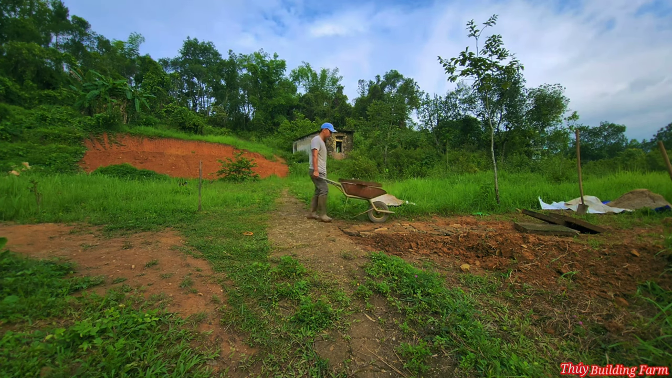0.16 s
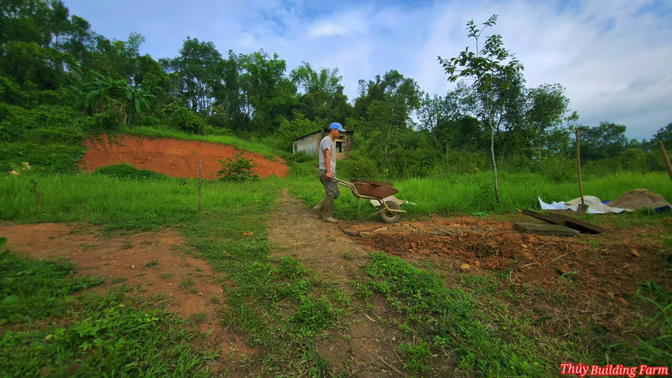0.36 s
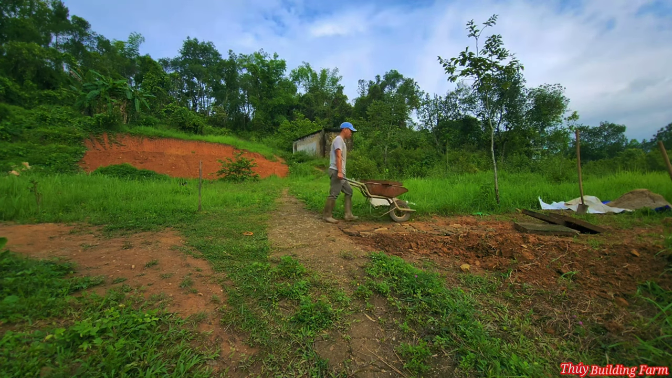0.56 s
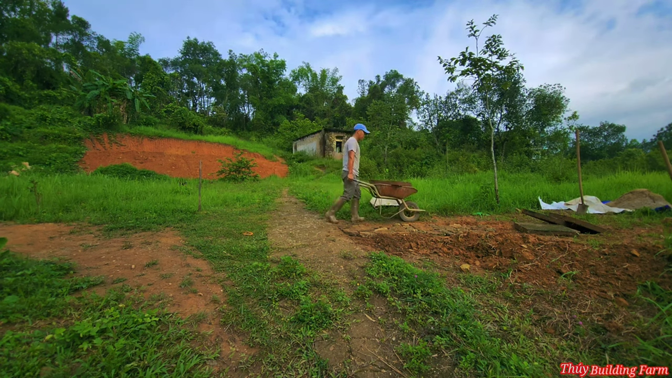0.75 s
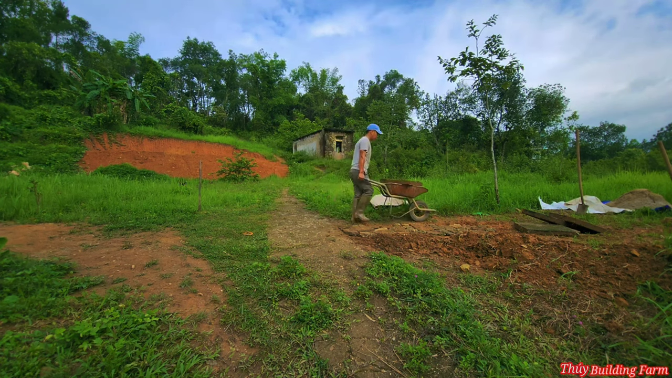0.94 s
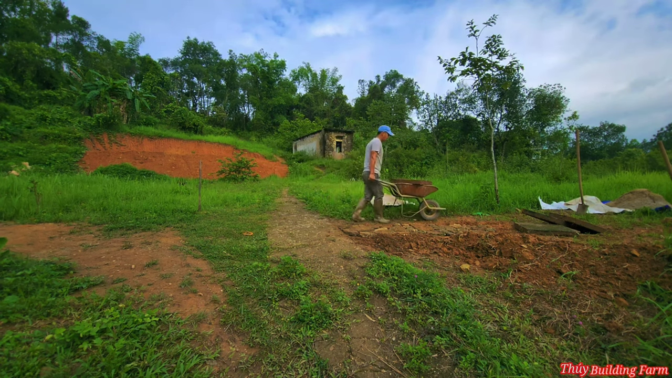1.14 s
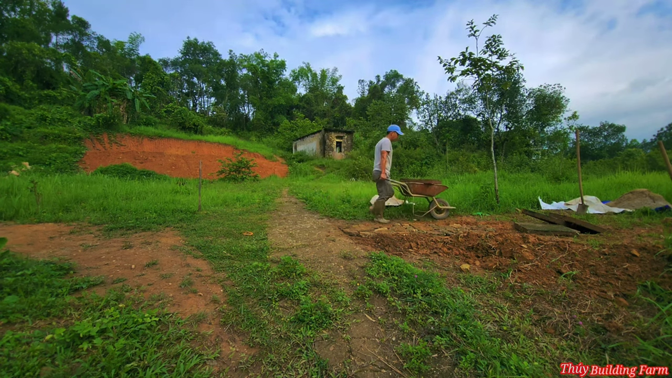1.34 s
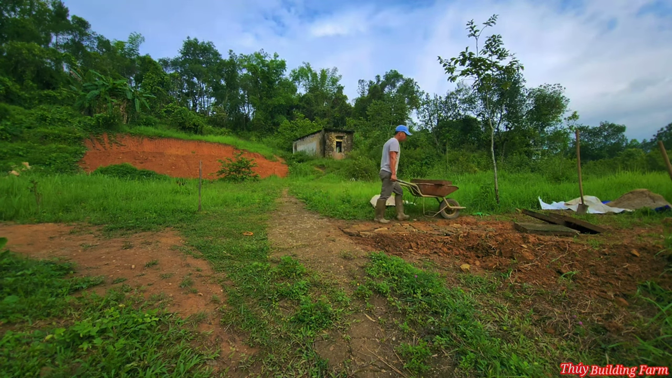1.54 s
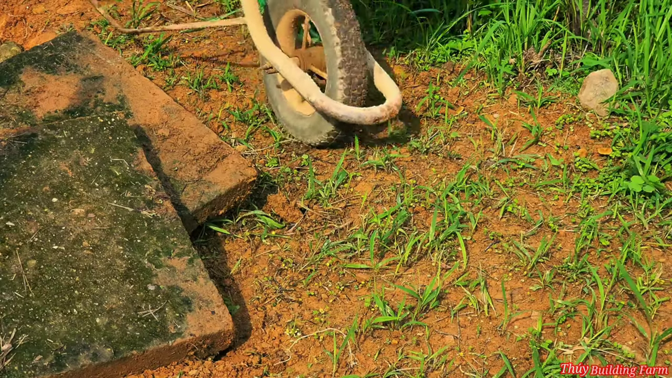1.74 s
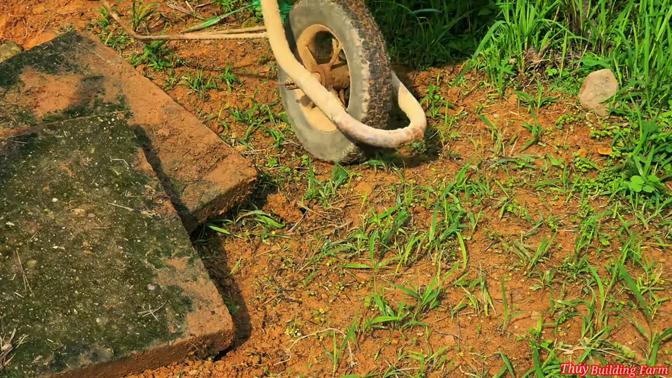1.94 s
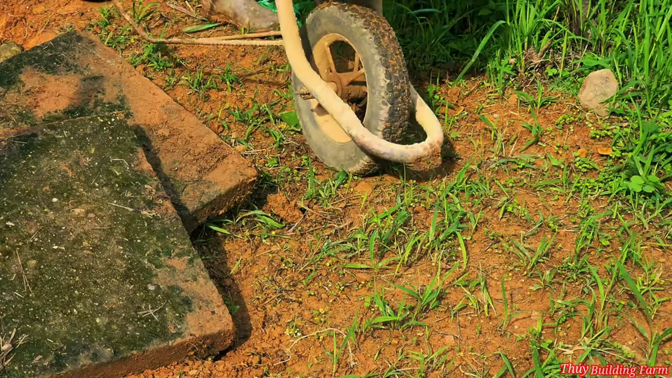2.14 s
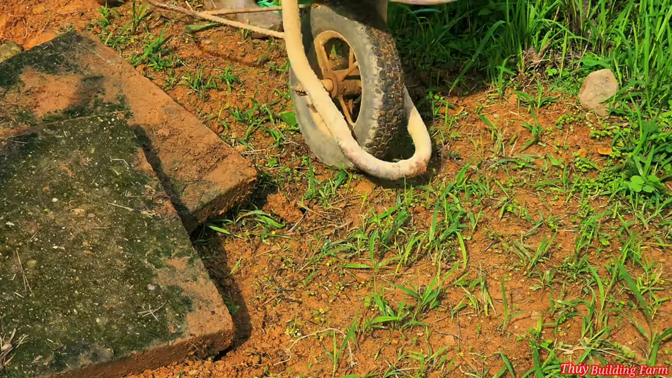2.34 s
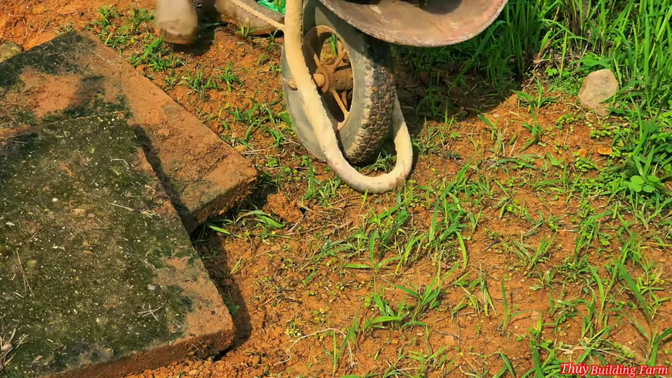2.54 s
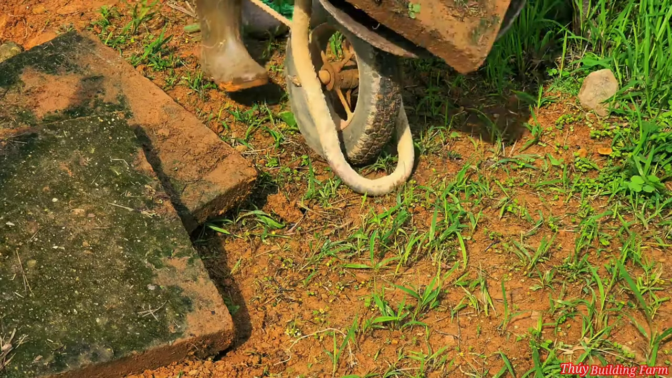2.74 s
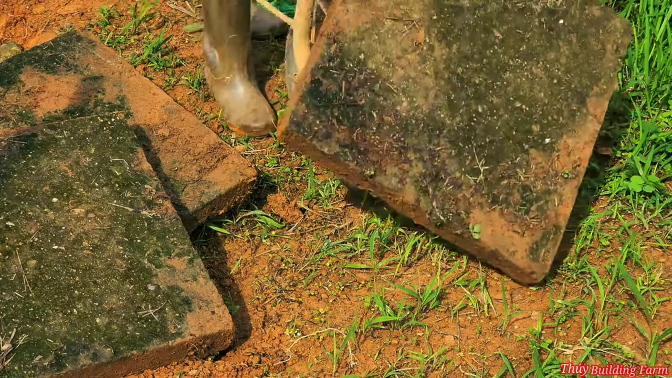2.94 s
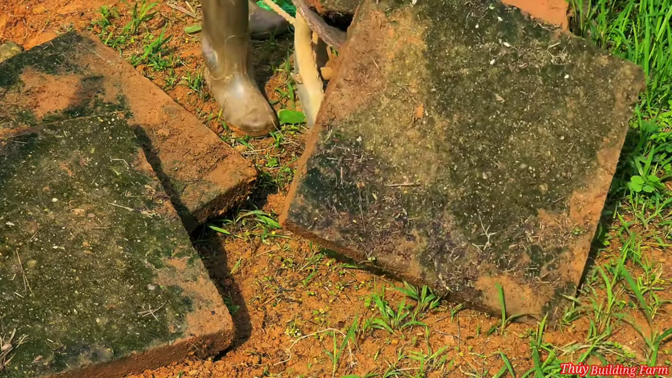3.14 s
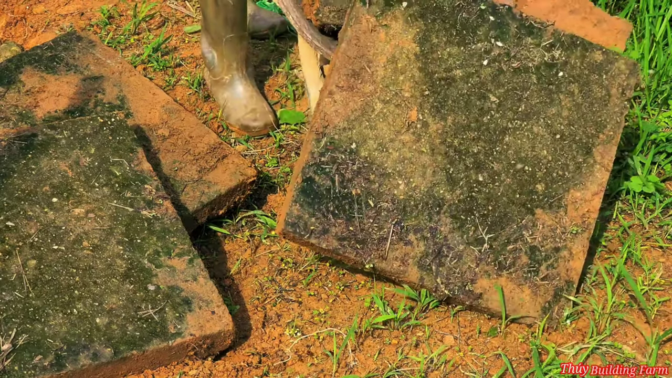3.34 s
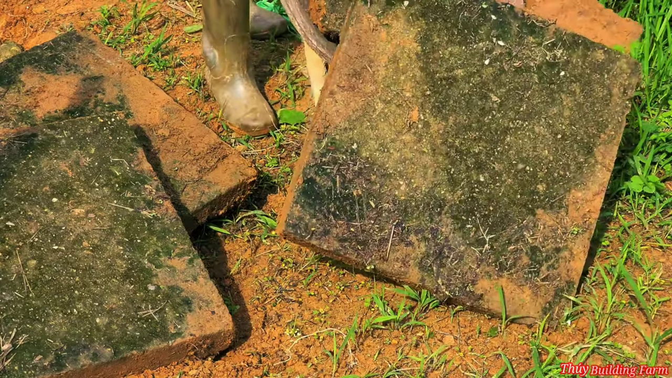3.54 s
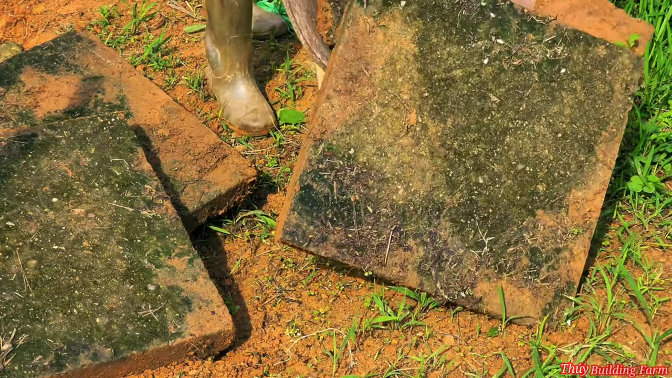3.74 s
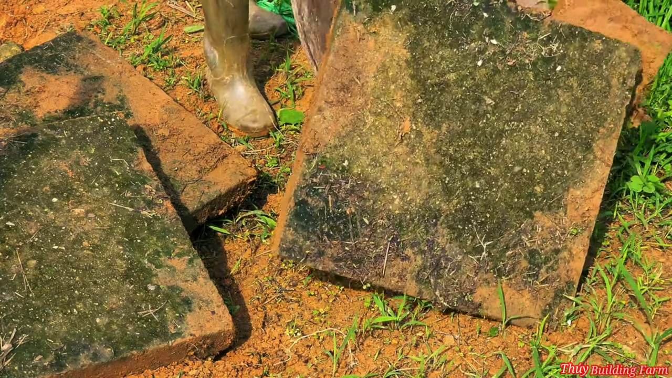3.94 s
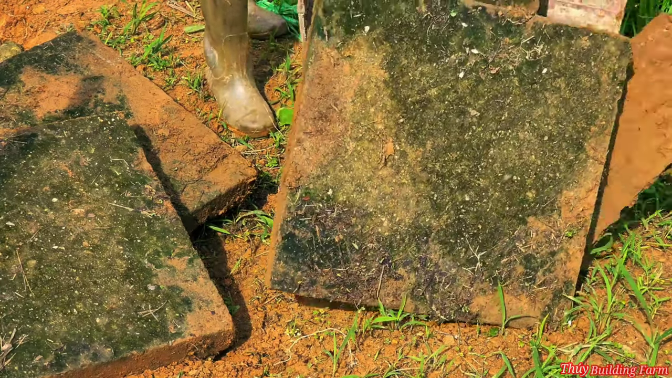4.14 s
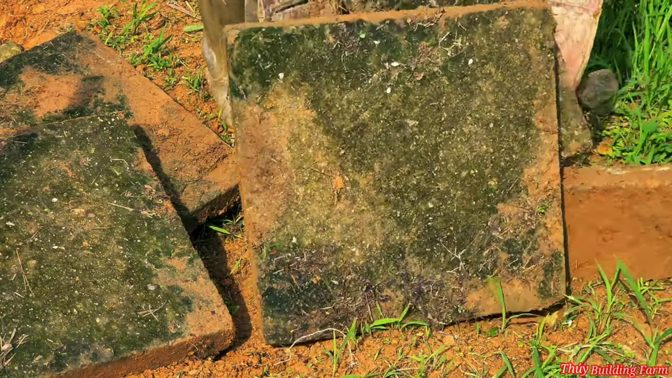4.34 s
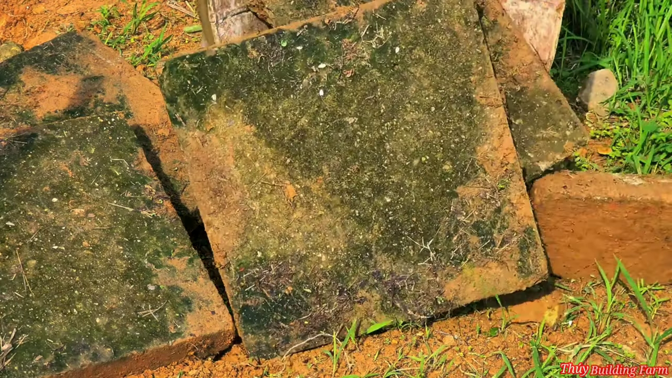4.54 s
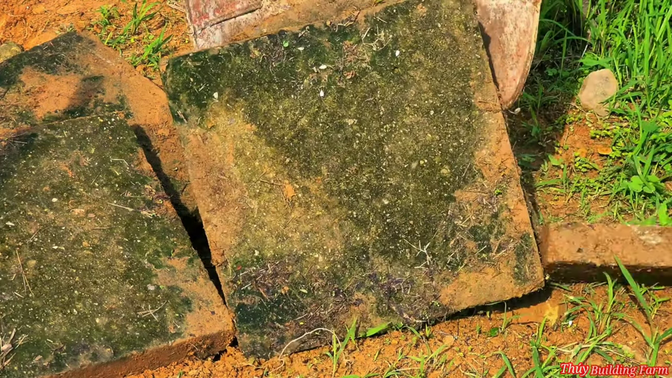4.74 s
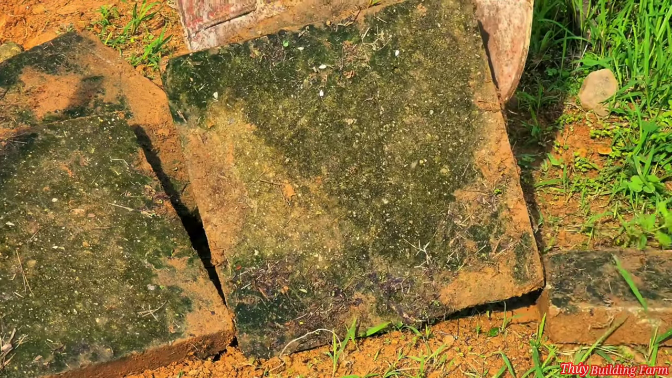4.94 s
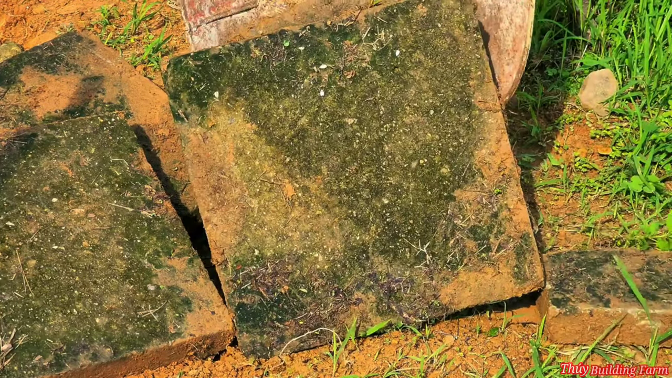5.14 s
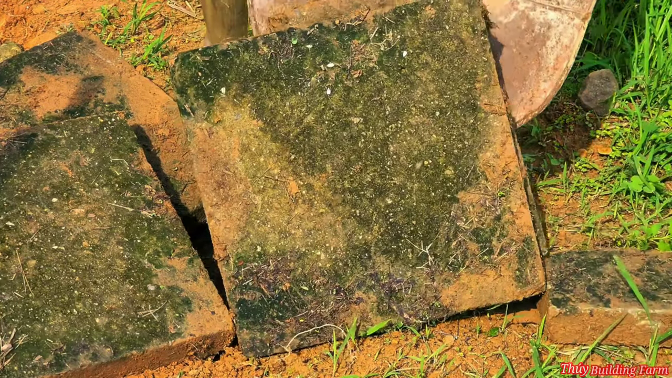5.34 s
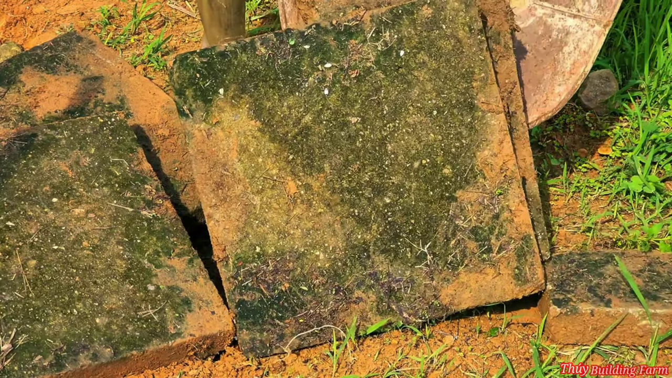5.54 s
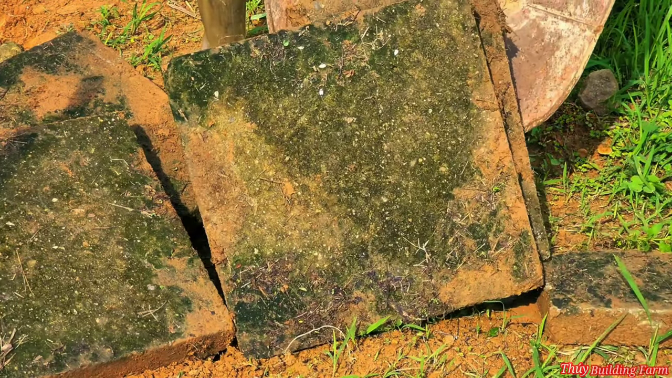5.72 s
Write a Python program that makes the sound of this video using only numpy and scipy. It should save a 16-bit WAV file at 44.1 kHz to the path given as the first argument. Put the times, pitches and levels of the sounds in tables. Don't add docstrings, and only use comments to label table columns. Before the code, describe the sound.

For the first 2.6 seconds it is quiet and outdoors: a high insect drone, thin leafy and airy hiss, low rumble, and a fast pulsing cricket until about 1.8. Small wheel crunches and a jolt open it, boots crunch near 0.4, a bird trills brightly to the right at 0.7 and 0.95, and crumbling dirt rolls at 1.3-1.6. Faint chirps come after 2.2. At 2.65 stone slabs slide over a steel tray, abruptly loud and very close: coarse grinding, hollow metal ringing, low squeals and a hard knock near 3.06. It drops at 3.5 to a quiet creaking creep, with falling bird whistles at 3.65, 3.7 and 3.98. From 4.1 a second grind swells, with jerking slips at 4.4 and 4.5 and heavy scraping to 4.95. Gritty low thuds at 5.0, then shorter knocks at 5.1-5.4 and a last one at 5.65 as the slabs settle. Peaks sound squashed.

```python
import sys
import numpy as np
from scipy import signal
from scipy.io import wavfile

SR = 44100
rng = np.random.default_rng(int(sys.argv[2]) if len(sys.argv) > 2 else 0)


def dump_mix(stems):
    frames = np.atleast_2d(stems).T
    limited = np.clip(frames, -1, 1)
    pcm = np.round(limited * 32767).astype(np.int16)
    wavfile.write(sys.argv[1], SR, pcm)


def how_loud(loudness_db):
    steps = np.asarray(loudness_db, float) / 20
    return 10 ** steps


N = 254898
TIP_S = 2.64
# pitch_hz, likeness
FAR_LIKENESS = [(60, 1), (180, 0.91), (550, 0.2), (1650, 0.47), (4970, 0.18), (15000, 0.33)]


def rms_one(x):
    return x / np.sqrt(np.mean(x ** 2) + 1e-20)


def in_time(rows):
    s, *columns = np.transpose(sorted(rows))
    t = np.arange(N) / SR
    return [np.interp(t, s, column) for column in columns]


def at_hz(points, hz):
    points_hz, values = np.array(points)[:, 0], np.array(points)[:, 1]
    return np.interp(np.log(hz), np.log(points_hz), values)


def drift(rate, size=N):
    r = np.exp(-40 * np.pi * rate / SR)
    noise = rng.standard_normal(size // 20 + 2002)
    slow = signal.lfilter([1], [1, -2 * r, r * r], noise)[2000:]
    return np.interp(np.arange(size) / 20, np.arange(len(slow)), rms_one(slow))


def resonate(x, hz, width_hz):
    r = np.exp(-np.pi * width_hz / SR)
    feed = np.array([1, 0, -1]) * (1 - r * r) / 2
    return signal.lfilter(feed, [1, -2 * r * np.cos(2 * np.pi * hz / SR), r * r], x)


def grains(per_s, spread_db, size=N):
    hardness_db = spread_db * np.minimum(rng.exponential(1, (4, size)), 5)
    ticks = how_loud(hardness_db) * rng.choice([-1, 1], (4, size))
    happens = rng.random((4, size)) < per_s / SR
    return rms_one(ticks * happens + 1e-18).reshape(2, 2, size)


def bands(source, spectrum, likeness, patchy_db, patchy_rate):
    edges = 28 * 2 ** np.arange(0, 9.6, .5)
    for k, (low, high) in enumerate(zip(edges, edges[1:])):
        band_pass = signal.butter(2, [low, high], "band", fs=SR, output="sos")
        mid, side = signal.sosfilt(band_pass, source[k % 2])
        hz = np.sqrt(low * high)
        alike = np.clip(at_hz(likeness, hz), -1, 1)
        gain = how_loud(at_hz(spectrum, hz) + patchy_db * drift(patchy_rate, len(mid)))
        yield hz, gain * (np.sqrt(1 + alike) * mid + np.sqrt(1 - alike) * side * [[1], [-1]])


def swells(rows):
    t = np.arange(N) / SR
    return sum(how_loud(db) * np.sin(np.pi * np.clip((t - s) / length, 0, 1)) for s, length, db in rows)


def surge(s, rise_s, fall_s, db):
    age = np.arange(N) / SR - s
    span_db = 20
    away = np.maximum(-age / max(rise_s, .002), age / max(fall_s, .01))
    return how_loud(2 * (db - span_db * away))


def insects():
    # time_s, level_db
    drone = [(0.0, -54), (0.43, -53), (0.72, -56), (0.89, -52.5), (1.11, -54.5), (1.74, -54.5),
             (2.11, -52.5), (2.48, -53.5), (2.6, -52)]
    # pitch_hz, width_hz, level_db
    singing = [(4900, 820, -8.5), (5220, 1600, 4), (5500, 430, 9), (5780, 78, 10), (7430, 1800, -3.5)]
    t = np.arange(N) / SR
    clicks = grains(per_s=7700, spread_db=0.0)[0]
    chorus = 0
    for hz, width_hz, db in singing:
        voice = resonate(resonate(clicks, hz, width_hz), hz, width_hz)
        chorus = chorus + how_loud(db + 1.5 * drift(8)) * voice
    chorus = signal.sosfilt(signal.butter(4, 4250, "high", fs=SR, output="sos"), chorus)
    chorus = chorus - resonate(chorus, 6720, 1160)
    after_db = -54
    chorus_db = np.where(t < drone[-1][0], in_time(drone)[0], after_db)

    cricket_hz, pulses_per_s, first_s, last_s = 8520, 40.0, -.004, 1.84
    beat = np.sin(np.pi * pulses_per_s * (t - first_s))
    cricket = (t < last_s) * np.abs(beat) ** 3 * np.sin(2 * np.pi * cricket_hz * t)
    cricket_db = -62 - 1.7 + 1.1 * drift(5.9)
    return how_loud(chorus_db) * rms_one(chorus) + how_loud(cricket_db) * cricket * how_loud([[1.5], [-1.5]])


def rumble_gain():
    # time_s, level_db
    jolts = [
        (.03, -56),
        (.41, -54.5),
        (.83, -60),
    ]
    early_db, later_db, stronger_s = -67.5, -61.5, 1.76
    steady_db = np.where(np.arange(N) / SR < stronger_s, early_db, later_db)
    jolt_power = sum(surge(s, rise_s=0.027, fall_s=0.14, db=db) for s, db in jolts)
    return np.sqrt(how_loud(2 * steady_db) + jolt_power)


def field():
    # pitch_hz, level_db (per Hz)
    field_colour = [(18, -39), (30, -9), (149, -1), (238, -11), (907, -22), (1310, -19), (3540, -40),
                    (4150, -15), (5680, 2), (6650, -30), (7990, -12), (9350, -25), (12500, -20),
                    (14600, -17), (15800, -17)]
    noise = rng.standard_normal((2, 2, N))
    parts = list(bands(noise, field_colour, FAR_LIKENESS, patchy_db=2.2, patchy_rate=3.2))
    rumble = sum(band for hz, band in parts if hz < 317)
    leaves = sum(band for hz, band in parts if 317 < hz < 3580)
    air = sum(band for hz, band in parts if 3580 < hz < 10000)
    top = sum(band for hz, band in parts if hz > 10000)
    hiss = how_loud(-69) * rms_one(leaves) + how_loud(-68.5) * rms_one(air) + how_loud(-68.5) * rms_one(top)
    return rumble_gain() * rms_one(rumble) + hiss


def walking():
    # start_s, length_s, level_db
    steps = [
        (.388, 0.047, -48.5),
        (.425, 0.031, -49),
        (1.8, 0.026, -68),
        (1.835, 0.0086, -55),
    ]
    # pitch_hz, level_db (per Hz)
    step_colour = [(35, -41), (60, -37), (163, 10), (810, -3), (1120, 3.5), (2710, 0), (5580, -6),
                   (9510, -15), (15500, -15)]
    # start_s, length_s, level_db
    clods = [
        (.032, 0.0088, -53),
        (.047, 0.011, -50),
        (.8, 0.027, -80),
        (.93, 0.036, -65),
        (1.3, 0.097, -54),
        (1.38, 0.17, -58),
        (1.48, 0.097, -58),
        (2.52, .08, -64),
    ]
    # pitch_hz, level_db (per Hz)
    wheel_colour = [(120, -37), (200, -6), (300, -4), (468, -18), (591, 2), (1060, -35), (1490, -2.5),
                    (3000, -17), (4940, -55), (8360, -120)]
    # start_s, length_s, pitch_hz, level_db
    frame_hums = [
        (0.56, 0.12, 362, -69),
        (1.285, 0.041, 340, -60),
        (1.334, 0.11, 1160, -70),
        (1.525, 0.079, 368, -59),
    ]
    size = int(TIP_S * SR)
    dirt = grains(per_s=3700, spread_db=4.5, size=size)
    crunch = sum(band for hz, band in bands(dirt, step_colour, FAR_LIKENESS, 0.83, 30))
    roll = sum(band for hz, band in bands(dirt[..., ::-1], wheel_colour, FAR_LIKENESS, 0.8, 48))
    near = swells(steps)[:size] * rms_one(crunch) + swells(clods)[:size] * rms_one(roll)
    for s, length, hz, db in frame_hums:
        hum = resonate(dirt[0, 0], hz, 17)
        near = near + swells([(s, length, db)])[:size] * rms_one(hum)
    return np.pad(near, ((0, 0), (0, N - size)))


def chirps():
    # start_s, notes (count), level_db
    trills = [
        (.715, 4, -35),
        (.939, 3, -34),
        (1.3, 1, -54),
        (1.38, 1, -52),
        (2.26, 2, -53),
        (2.41, 3, -55),
        (2.59, 2, -52),
    ]
    # start_s, length_s, start_hz, end_hz, level_db
    whistles = [
        (3.637, 0.028, 6470, 2900, -39.5),
        (3.698, 0.037, 5500, 3700, -37),
        (3.975, 0.046, 5500, 3700, -40),
    ]
    gap_s, note_s, grows_s, grows_db = .0355, 0.018, 0.001, 1.0
    top_hz, end_hz, sinks_hz = 5160, 4120, 45
    notes = list(whistles)
    for s, count, db in trills:
        for k in range(round(count)):
            notes.append((s + k * gap_s, note_s + k * grows_s, top_hz, end_hz - k * sinks_hz,
                          db + k * grows_db))
    return notes


def bird():
    out = np.zeros(N)
    for s, length, start_hz, end_hz, db in chirps():
        first, size = int(s * SR), int(length * SR)
        x = np.arange(size) / size
        hz = start_hz * (end_hz / start_hz) ** x
        loudness = how_loud(db) * np.sin(np.pi * x ** 1.12)
        out[first:first + size] += loudness * np.sin(2 * np.pi * np.cumsum(hz) / SR)
    direct = np.array([out, np.roll(out, 6)]) * how_loud([[-3], [3]])
    return direct + how_loud(-45) * np.roll(out, 700)


def load():
    # time_s, pressure_db, weight_db (added to pressure)
    slides = [
        [(2.64, -67, -8), (2.69, -20, -11.5), (2.734, -24.5, -4), (2.808, -13, -11), (2.862, -18, -4),
         (2.874, -14, -5), (2.918, -12.5, -8.5), (3.362, -13.5, -1.5), (3.51, -34.5, -2)],
        [(3.52, -40, 9), (3.546, -32, -10), (3.602, -41.5, -4), (3.716, -37.5, 8), (3.75, -29.5, -0.5),
         (3.864, -32, -2), (4.048, -28, 5.5), (4.084, -28.5, -23), (4.09, -25, 8)],
        [(4.1, -24, 6.5), (4.114, -21.5, 3), (4.274, -12.5, -3.5), (4.32, -15, 3), (4.392, -19, -11),
         (4.546, -14, -9.5), (4.684, -18, -4.5), (4.826, -9.5, -2.5), (4.965, -18.5, 1)],
        [(4.975, -24, 2), (5.101, -32.5, -2), (5.133, -20.5, -16), (5.213, -41, -13), (5.219, -24, -18),
         (5.507, -27.5, 3), (5.633, -44, -12), (5.651, -39, 10), (5.78, -40.5, -14)],
    ]
    # slip_s, change_db
    sticks = [
        (4.408, -3.5),
        (4.512, -7),
        (4.703, -4),
        (5.122, -16),
        (5.218, 1),
        (5.266, -2),
        (5.646, -2.5),
    ]
    stick_s = 0.04
    t = np.arange(N) / SR
    pressure_db, weight_db = in_time([tuple(row) for slide in slides for row in slide])
    caught_db = sum(db * (t < s) * np.clip(2 + 2 * (t - s) / stick_s, 0, 1) for s, db in sticks)
    return pressure_db + caught_db, pressure_db + weight_db


def stroke_levels():
    # fastest_s, rise_s, fall_s, scrape_db, dryness_db
    jerk_rows = [(2.687, 0.027, 0.017, -29.5, -11), (2.81, 0.054, 0.056, -24.5, -4.5),
                 (2.918, 0.1, 0.15, -22, 0), (3.065, 0.025, 0.15, -19, -3),
                 (3.206, 0.14, 0.07, -20.5, -2.5), (3.36, 0.18, 0.093, -19, -3),
                 (3.523, 0.0085, 0.12, -40.5, -0.5), (3.762, 0.16, 0.48, -40, 1.5),
                 (3.934, 0.15, 0.14, -32.5, -5), (4.1, 0.059, 0.18, -38, 1),
                 (4.263, 0.16, 0.13, -20.5, -3.5), (4.412, 0.0043, 0.071, -16, 2),
                 (4.447, 0.027, 0.054, -12.5, -2.5), (4.529, 0.02, 0.19, -17, -2),
                 (4.63, 0.043, 0.043, -20, -2), (4.71, 0.048, 0.21, -28.5, 4),
                 (4.874, 0.16, 0.081, -20.5, 1.5), (4.983, 0.014, 0.024, -31, 11.5),
                 (5.042, 0.018, 0.038, -40.5, 12.5), (5.127, 0.011, 0.029, -19.5, -1),
                 (5.222, 0.0033, 0.026, -14.5, -2), (5.286, 0.025, 0.074, -21, 3.5),
                 (5.458, 0.53, 0.048, -31, -5.5), (5.648, 0.0059, 0.089, -24, -6.5)]
    pressure_db, heft_db = load()
    scrape, grit = 0, 0
    for s, rise_s, fall_s, db, dry_db in jerk_rows:
        jerk = surge(s, rise_s, fall_s, db)
        scrape = scrape + jerk
        grit = grit + jerk * how_loud(2 * dry_db)
    pressed = how_loud(2 * 0.91 * pressure_db)
    powers = [how_loud(2 * pressure_db) + how_loud(2 * -4.5) * scrape,
              scrape + how_loud(2 * -18) * pressed,
              grit + how_loud(2 * -24.5) * pressed]
    return [heft_db] + [10 * np.log10(power) for power in powers]


def sheet_ring(small_db):
    # pitch_hz, width_hz, level_db (over the bare contact)
    tray_tones = [(105, 40, 7.5), (159, 11, 4.5), (235.4, 22.6, 13), (395, 24, -8), (534, 110, 5.5),
                  (670, 57, 12), (853, 188, 12.5), (948, 34, 8.5), (1123, 11, -36), (1338, 83, 12),
                  (1660, 6.4, -48), (1915, 31, 16.5), (2126, 54, 10), (2230, 20, 7)]
    t = np.arange(int(.12 * SR))[:, None] / SR
    lesser_hz = np.exp(rng.uniform(np.log(330), np.log(4500), 30))
    lesser_db = small_db - 0.59 * np.log2(lesser_hz / 1000)
    lesser = np.column_stack([lesser_hz, 0.65 * np.sqrt(lesser_hz), lesser_db])
    hz, width_hz, db = np.vstack([tray_tones, lesser]).T
    height = how_loud(db + rng.normal(0, 3, len(hz))) * 2 * np.pi * width_hz / SR
    ring = (np.cos(2 * np.pi * hz * t) * np.exp(-np.pi * width_hz * t)) @ height
    ring[0] = 1
    return ring


def grind():
    # pitch_hz, level_db (per Hz)
    grind_colour = [(45, -41), (75, -11.5), (130, -1.5), (190, 1), (270, -4.5), (380, -3), (530, -5.5),
                    (750, -10), (1070, -8.5), (1500, -9), (2130, -20.5), (3000, -21), (6000, -23.5),
                    (15800, -25)]
    # pitch_hz, likeness
    near_likeness = [(60, 0.97), (150, 1), (380, 0.97), (950, 0.85), (2380, 0.8), (5980, -0.11),
                     (15000, -0.26)]
    first = int(TIP_S * SR)
    size = N - first
    contacts = grains(per_s=6000, spread_db=1.5, size=size)
    contacts = contacts * how_loud(1.3 * drift(40, size))
    shares = how_loud(8 * np.array([drift(5, size) for spot in range(5)]))
    shares = shares / np.sqrt(np.sum(shares ** 2, axis=0))
    source = 0
    for share in shares:
        ring = sheet_ring(small_db=13.0)[None, None]
        source = source + signal.fftconvolve(contacts * share, ring, axes=2)[..., :size]
    layers = [0, 0, 0, 0]
    for hz, band in bands(source, grind_colour, near_likeness, patchy_db=2.5, patchy_rate=9.7):
        layer = np.searchsorted([317, 1790, 5070], hz)
        layers[layer] = layers[layer] + band
    sound = sum(how_loud(db[first:] - 2.5) * rms_one(layer) for db, layer in zip(stroke_levels(), layers))
    return np.pad(sound, ((0, 0), (first, 0)))


def ground():
    shake_db, hold_s = -26, 0.15
    grows_db, slabs_down_s = 9.5, 3.3
    t = np.arange(N) / SR
    low_band = signal.butter(2, [60, 110], "band", fs=SR, output="sos")
    shake = signal.sosfilt(low_band, rng.standard_normal(N))
    r = np.exp(-1 / (hold_s * SR))
    held = signal.lfilter([1 - r], [1, -r], (t >= TIP_S) * how_loud(load()[1]))
    return how_loud(shake_db + grows_db * (t > slabs_down_s)) * held * rms_one(shake)


def knocks():
    # start_s, peak_db, low_db, grit_db, fade_s (time to drop 60 dB)
    hits = [(2.682, -28, 3.5, -32, 0.11), (3.062, 0.5, -2.5, -27, 0.11), (3.5184, -31, -24, -22, 0.17),
            (4.412, 2.5, -14, -23, 0.23), (4.515, 2, -11, -16.5, 0.13), (4.975, -23, 11, 0, 0.053),
            (4.9746, -23, 15, -2, 0.05), (5.038, -27, 10, -9, 0.22), (5.125, -12.5, -2, -29, 0.098),
            (5.218, -10.5, 0.5, -27, 0.092), (5.2697, -1, -30, -10, 0.24),
            (5.3612, -13.5, -5.5, -8.5, 0.29), (5.649, 1, -17.5, -13, 0.061)]
    # pitch_hz, level_db, ring_s (time to drop 37 dB)
    slab_tones = [(497, -1, 0.13), (844, 6, 0.13), (1243, 5.5, 0.096), (2210, -19.5, 0.079),
                  (2865, -18, 0.11), (3700, -28.5, 0.0061), (5010, -19, 0.031), (7500, -46, .05)]
    t, out = np.arange(N) / SR, np.zeros((2, N))
    mid, side = rng.standard_normal((2, N))
    high_pass = signal.butter(2, 4500, "high", fs=SR, output="sos")
    grit = signal.sosfilt(high_pass, [mid + side, side - mid])
    luck_db = rng.normal(0, 2.77, (len(hits), len(slab_tones)))
    for (s, peak_db, low_db, grit_db, fade_s), strengths_db in zip(hits, luck_db):
        at = slice(int(s * SR), min(N, int((s + .4) * SR)))
        age = t[at] - t[at][0]
        fall = np.minimum(age / .0015, 1) * how_loud(-60 * age / fade_s)
        out[:, at] += how_loud(peak_db + grit_db - 6) * fall * grit[:, at]
        for (hz, tone_db, ring_s), own_db in zip(slab_tones, strengths_db):
            ring = resonate(fall * mid[at], hz, 1.36 / ring_s)
            extra_db = low_db if hz < 1500 else 0
            out[:, at] += how_loud(peak_db + tone_db + own_db + extra_db + 12.5) * ring
    return out


def squeals():
    # start_s, length_s, pitch_hz, width_hz, level_db
    catches = [(2.779, 0.045, 395, 22, -19), (2.978, 0.095, 230.8, 6.3, -14), (3.174, 0.12, 247.8, 17, -17),
               (3.267, 0.057, 395, 12, -13), (4.116, 0.094, 466, 75, -21), (3.219, 0.02, 7100, 740, -32),
               (3.532, 0.046, 1780, 50, -46), (3.655, 0.029, 1765, 60, -44.5), (3.96, 0.066, 1766, 40, -41),
               (5.258, 0.082, 2244, 160, -24), (5.355, 0.07, 100, 19, -27.5), (2.91, 0.13, 1338, 72, -21),
               (4.513, 0.087, 105, 11, -15), (4.517, 0.076, 943, 27, -22)]
    out, noise = 0, rng.standard_normal(N)
    for s, length, hz, width_hz, db in catches:
        tone = resonate(resonate(noise, hz, width_hz), hz, width_hz)
        out = out + swells([(s, length, db)]) * rms_one(tone)
    return out


def scene():
    return insects() + field() + walking() + bird() + grind() + ground() + knocks() + squeals()


def band_limit(x):
    return signal.sosfilt(signal.butter(12, 16480, fs=SR, output="sos"), x)


def record(dry):
    squashed = np.clip(1.444 * np.tanh(dry / 0.9), -.93, .93)
    top_cut = signal.cheby2(18, 70, 16000, fs=SR, output="sos")
    mix = signal.sosfilt(top_cut, squashed)
    return band_limit(mix)


dry = scene()
out = record(dry)
dump_mix(out)
```